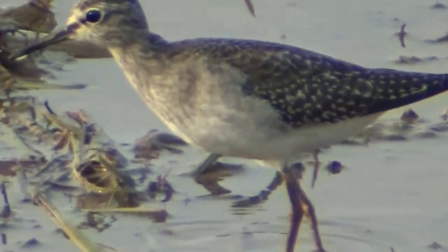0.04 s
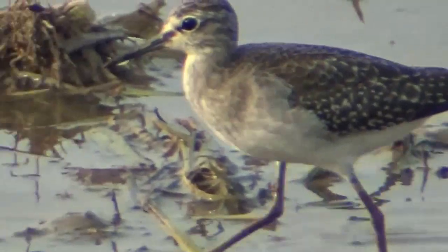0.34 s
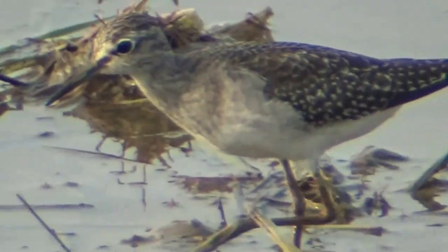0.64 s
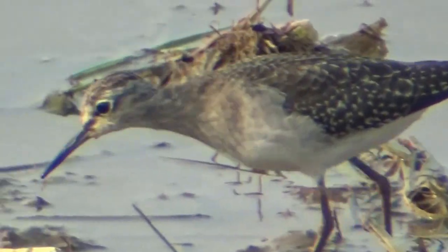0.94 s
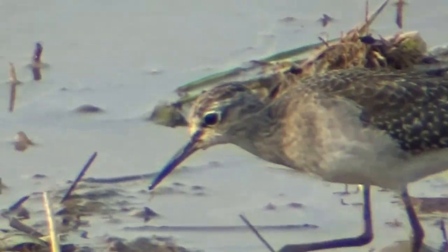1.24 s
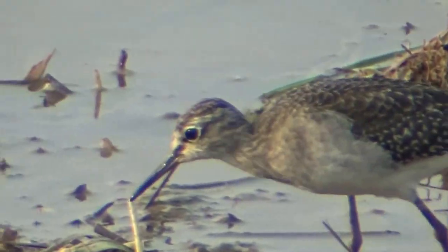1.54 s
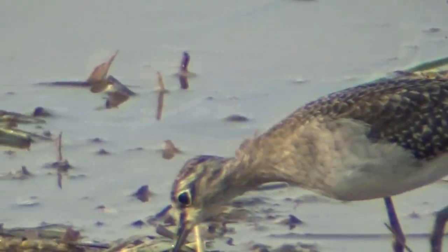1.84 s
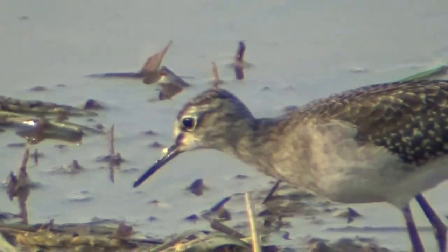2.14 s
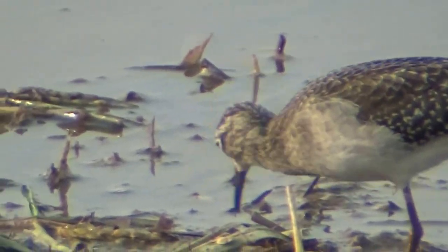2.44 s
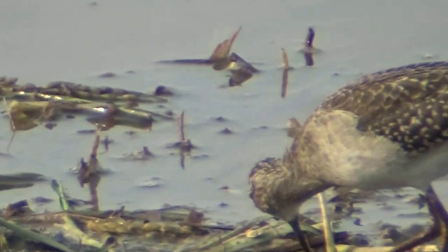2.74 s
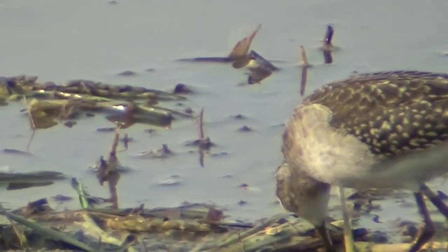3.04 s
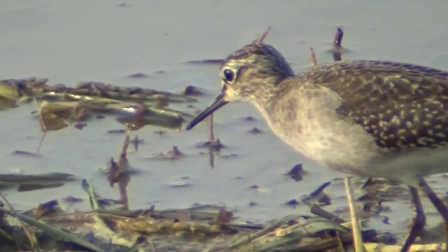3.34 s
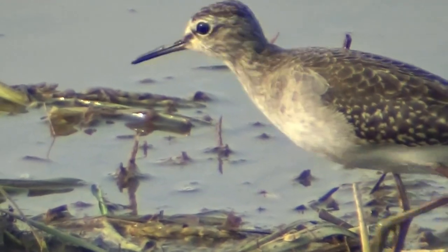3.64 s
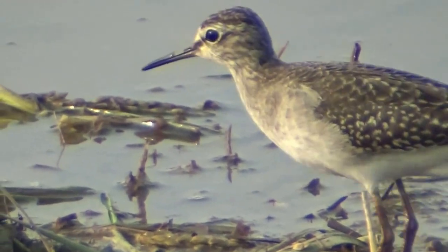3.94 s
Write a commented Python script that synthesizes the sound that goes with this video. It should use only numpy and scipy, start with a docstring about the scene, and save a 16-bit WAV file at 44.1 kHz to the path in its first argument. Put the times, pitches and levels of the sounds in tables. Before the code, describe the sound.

Small birds chirp faintly throughout, outdoors by shallow water, over a low wind-like rumble and a distant engine slowly gathering speed. A lone click comes at 0.9 seconds. Around 1.8 seconds one bird gives five quick, harsh, falling notes. A faint plip follows at 2.3, then a close wet smack at 3. From 3.2 a softer harsh run sounds, with dry clicks that gradually slow until the end.

```python
"""The edge of a muddy pool. From the start small birds whistle some way off, while the harmonic drone of
a far engine slowly gathers speed in a low, wind-like rumble. After a lone click, one bird gives a quick
run of harsh, falling notes, their harmonics filtered by its throat. A faint plip follows, then a wet
smack close by, both damped resonances. Last, the bird gives a second run as a small stiff body starts
to ring with dry clicks that gradually slow."""
import sys
import numpy as np
from scipy import signal
from scipy.fft import rfft, irfft
from scipy.io import wavfile

SR = 44100
rng = np.random.default_rng(int(sys.argv[2]) if len(sys.argv) > 2 else 0)


def persist_wave(psi):
    """Save psi, clipped to +-1, as 16-bit WAV."""
    counts = np.round(np.clip(psi, -1, 1) * 32767).astype(np.int16)
    wavfile.write(sys.argv[1], SR, np.atleast_2d(counts).T)


N = 176400
T = np.arange(N) / SR

# Harsh notes: (time of peak pitch [s], peak pitch [Hz], source level [dB], pitch decay constant [s],
# roughness of the opening [0-1])
HARSH_NOTES = [(1.802, 1093, -45.5, 0.048, 0.81), (1.863, 1100, -43, 0.054, 0.76),
               (1.926, 1079, -42, .055, .62), (1.992, 1081, -41.5, 0.054, 0.47),
               (2.052, 1075, -44.5, 0.054, 0.42), (3.218, 1070, -52, 0.074, 0.78),
               (3.284, 1068, -49.5, .06, 0.86), (3.351, 1058, -50.5, .065, 0.75),
               (3.431, 1056, -51.5, .065, 0.51)]
# Throat resonances: (frequency [Hz], gain [dB])
THROAT_RESPONSE = [(900, -36), (1500, -47), (1950, -11.5), (2450, -4.5), (2950, -1), (3400, -7.5),
                   (3900, -7.5), (4600, -24), (5600, -15), (6800, -33), (8100, -17.5), (9600, -44),
                   (13000, -33), (16000, -37)]

def chatter(rasp_s=.027, rise_hz_per_s=6000, swell_s=.007, hold_s=.0043, tail_s=.038, edge_s=.0032):
    """Source and filter: a breathy rising rasp clears and falls, sweeping harmonics through formants."""
    out, jitter, flutter = np.zeros(N), drift(306), drift(306)
    t = np.arange(-rasp_s, tail_s, 1 / SR)  # zero at the peak pitch
    opening = np.clip(-2 * t / edge_s, 0, 1)
    envelope = np.clip(np.minimum((t + rasp_s) / swell_s, (tail_s - t) / edge_s), 0, 1)
    fade_db = 380 * np.maximum(t - hold_s, 0)
    for s, peak_hz, db, fall_s, rough in HARSH_NOTES:
        here = int(s * SR) + np.arange(len(t))
        rasp = rough * opening
        roughness = .08 + rasp
        hz = np.where(t < 0, peak_hz + rise_hz_per_s * t, peak_hz * np.exp(-t / fall_s))
        phase = phase_of(hz * (1 + .1 * roughness * jitter[here]))
        voice = sum(np.sin(k * phase) for k in range(1, 15))
        voice += (from_db(6 * (1 - rasp)) - 1) * np.sin(3 * phase)  # third harmonic grows as it clears
        breath = from_db(-9) * rasp * np.sqrt(SR / peak_hz) * rng.standard_normal(len(t))
        gain = envelope * from_db(db - 2.5 * opening - fade_db)
        add(out, s - rasp_s, (voice + breath) * gain * (1 + .44 * roughness * flutter[here]))
    return np.sqrt(2) * coloured(out, THROAT_RESPONSE)


# Whistles: (time [s], duration [s], first pitch [Hz], middle pitch [Hz], last pitch [Hz], level [dB],
# roughness [relative])
WHISTLES = [(0.037, 0.035, 2774, 2500, 2270, -60, 0.37), (0.062, 0.033, 4350, 4880, 4550, -63, .2),
            (0.189, 0.03, 6860, 6450, 5500, -66, 0.24), (.24, 0.028, 3990, 4450, 4300, -66.5, .3),
            (0.323, 0.06, 4210, 4120, 3450, -63.5, .7), (0.471, .04, 3100, 2684, 1760, -55, 0.57),
            (0.558, 0.03, 2014, 2490, 4200, -56.5, 1.15), (0.598, 0.027, 4090, 4190, 3480, -51, 0.24),
            (0.933, 0.033, 3330, 2300, 1780, -54.5, 0.26), (.973, 0.055, 1447, 1796, 2020, -53, 0.08),
            (0.976, 0.037, 2930, 3460, 3700, -62, 0.07), (1.078, .03, 4080, 4040, 3950, -64.5, 0.1),
            (1.112, 0.024, 3590, 3850, 4200, -62.5, 0.14), (1.274, 0.044, 3030, 3210, 3370, -62.5, 0.03),
            (1.407, 0.067, 3970, 3950, 4000, -61, 0.27), (1.446, 0.061, 3370, 2700, 1870, -57, 0.71),
            (1.489, 0.02, 3600, 4200, 5370, -54.5, 0.25), (1.508, 0.019, 4800, 4220, 3500, -50.5, 0.27),
            (1.528, 0.021, 5430, 3270, 2290, -51.5, 0.4), (1.542, .013, 5000, 4150, 3500, -49.5, 0.6),
            (1.55, 0.026, 2440, 2110, 1970, -58, .3), (2.121, 0.042, 2616, 2077, 1650, -51, 0.27),
            (2.162, 0.078, 1746, 2200, 2310, -54.5, 0.21), (2.238, 0.043, 2400, 2480, 2480, -56.5, 0.33),
            (2.57, .03, 2930, 4340, 3380, -51.5, 0.17), (2.597, .021, 3040, 3650, 3250, -43.5, 0.12),
            (2.612, 0.027, 2950, 3030, 2870, -45, 0.37), (2.679, 0.07, 4070, 4110, 3320, -61, 0.62),
            (2.732, 0.042, 3890, 3870, 3960, -54, 0.14), (2.815, .03, 3350, 4950, 5080, -55.5, .4),
            (2.841, 0.016, 5120, 3860, 3250, -45.5, 0.29), (2.851, 0.024, 3380, 3200, 3100, -51.5, 0.09),
            (2.929, 0.056, 2920, 2590, 1960, -50.5, .35), (2.982, 0.034, 2183, 2050, 1690, -48, 0.23),
            (3.017, 0.071, 3170, 3980, 3670, -60, 0.58), (3.101, 0.045, 3186, 2960, 2500, -56.5, 0.64),
            (3.236, 0.044, 3610, 2950, 2390, -51, 0.79), (3.315, 0.037, 3694, 3040, 2600, -50.5, .8),
            (3.491, .06, 2560, 3020, 4600, -62.5, 0.8), (3.627, 0.057, 3220, 2540, 1970, -57, 0.74),
            (3.664, 0.019, 2550, 3380, 4700, -58, 0.13), (3.681, 0.033, 3180, 2780, 2340, -56, 0.54),
            (3.89, 0.056, 3670, 3930, 3600, -58, 0.48)]
# Their overtones: (frequency [Hz], level relative to the fundamental [dB])
WHISTLE_OVERTONES = [(4000, -17), (6800, -25.5), (10000, -17), (13000, -31)]

def twitter(jitter_depth=.1506, flutter_depth=.85):
    """Random modulation of frequency and amplitude adds sidebands that make gliding whistles buzz."""
    out, jitter, flutter = np.zeros(N), drift(390), drift(390)
    for s, length, first, middle, last, db, rough in WHISTLES + far_whistles():
        progress = np.linspace(0, 1, int(length * SR))
        here = (int(s * SR) + np.arange(len(progress))) % N
        hz = np.polyval(np.polyfit([0, .5, 1], [first, middle, last], 2), progress)
        phase = phase_of(hz * (1 + jitter_depth * rough * jitter[here]))
        overtones = sum(from_db(at_hz(WHISTLE_OVERTONES, k * hz)) * np.sin(k * phase) for k in (2, 3))
        envelope = np.sqrt(2) * from_db(db) * np.sin(np.pi * progress)
        add(out, s, (np.sin(phase) + overtones) * envelope * (1 + flutter_depth * rough * flutter[here]))
    return out


def far_whistles(count=30, centre_hz=3210, length_s=.045, db=-67, rough=.3):
    """A random chorus: rows for fainter whistles, scattered in time and around one pitch."""
    starts = (np.arange(count) + rng.random(count)) / count * N / SR
    offsets = rng.uniform(-.18, .18, (count, 1))
    bends = rng.uniform(-.12, .12, (count, 3))
    pitches = centre_hz * np.exp(offsets + bends)
    return [(s, length_s, *hz, db, rough) for s, hz in zip(starts, pitches)]


# Thin scratchy calls: (time [s], duration [s], level [dB])
SCRATCHY_CALLS = [(0.159, 0.026, -56.5), (0.541, 0.039, -55), (0.56, 0.076, -61), (1.509, 0.052, -61.5),
                  (2.098, 0.037, -51), (2.561, 0.037, -58.5), (3.859, 0.047, -61.5)]
# Their spectrum: (frequency [Hz], relative level [dB])
SCRATCH_SPECTRUM = [(1500, -47), (2800, 4), (5000, 1.5), (7000, -4.5), (10000, 2), (12500, -17),
                    (16000, -34)]

def scratches():
    """Aperiodic sound has no pitch: bursts of shaped noise rasp among the twitter."""
    envelope = np.zeros(N)
    for s, length, db in SCRATCHY_CALLS:
        add(envelope, s, from_db(db) * np.hanning(int(length * SR)))
    return envelope * noise(SCRATCH_SPECTRUM)


# Dry clicks: (time [s], level [dB], treble tilt [dB/octave])
CLICK_IMPACTS = [(0.905, -43, 1.5), (3.2202, -40.5, 1), (3.2385, -38.5, 0), (3.2553, -38.5, -2),
                 (3.2792, -38.5, 0.5), (3.3173, -41, 0.5), (3.336, -42, -1), (3.3521, -49.5, 4),
                 (3.358, -49, 1), (3.3906, -34.5, -1), (3.4571, -33, -0.5), (3.5697, -34, 0),
                 (3.685, -33.5, .5), (3.7964, -32, -.5), (3.9492, -31, -1)]
# Modes of the small stiff body: (frequency [Hz], relative level [dB], 60 dB decay time [s])
BODY_MODES = [(705, -18, .012), (1130, -9.5, 0.011), (1467, -6, 0.012), (2260, -2, 0.017),
              (2630, -3.5, .007), (3090, -9.5, .006), (3910, -13.5, 0.014), (4640, -11.5, 0.014),
              (5960, -13, 0.0072), (7513, -15.5, 0.0043), (9000, -7.5, 0.0066), (10450, -23, .0036),
              (12500, -21, .0035), (14200, -13, .006)]

def clicks(snap_s=.003, lag_s=.0009, pivot_hz=1467, spread_db=1.5, detune=.035):
    """Modal ringing with dispersion: a stiff body snaps and rebounds, its highs ahead of its lows."""
    out, t, impulse = np.zeros(N), T[:SR // 20], signal.unit_impulse(SR // 20)
    for s, db, tilt_db in CLICK_IMPACTS:
        rebound_s = .0018 * (1 + .25 * rng.standard_normal())
        snap = rng.standard_normal(len(t)) * np.exp(-t / snap_s)
        add(out, s, from_db(db - 12) * snap)
        for k, (hz, mode_db, t60) in enumerate(BODY_MODES):
            ratio = hz / pivot_hz
            gain = from_db(db + mode_db + tilt_db * np.log2(ratio) + spread_db * rng.standard_normal())
            detuned_hz = hz * (1 + detune * rng.uniform(-2.1, 1.9))
            mode = (-1) ** k * gain * ring(impulse, detuned_hz, t60)
            arrival = s + lag_s / np.sqrt(ratio)
            add(out, arrival, mode)
            add(out, arrival + rebound_s, from_db(-2.5) * mode)
    return out


# Resonances of the wet smack: (frequency [Hz], relative level [dB], 60 dB decay time [s])
SMACK_RESONANCES = [(783, 2.5, 0.015), (1060, 5.5, 0.0032), (1990, -4, 0.014), (2750, -5, 0.014),
                    (3500, -4.5, 0.017), (4870, -5, 0.0054), (6100, -14, 0.0085), (8900, -6.5, 0.0065),
                    (9950, -12, .005)]

def water(plip_s=2.322, plip_db=-44, smack_s=2.9867, smack_db=-26):
    """Damped free vibration: one resonance makes a faint plip, several at once a sharp wet smack."""
    out, impulse = np.zeros(N), signal.unit_impulse(SR // 5)
    add(out, plip_s, from_db(plip_db) * ring(impulse, hz=958, t60=.05))
    for k, (hz, db, t60) in enumerate(SMACK_RESONANCES):
        add(out, smack_s, (-1) ** k * from_db(smack_db + db) * ring(impulse, hz, t60))
    return out


# Far engine gathering speed: (time [s], firing rate [Hz], level [dB])
ENGINE_RUN = [(0, 74.2, -54.5), (.56, 77.15, -60), (1.1, 80.94, -50.5), (1.71, 84.7, -53),
              (2.5, 89.36, -49.5), (3.3, 93.06, -46), (4, 93.7, -45.5)]
# Its orders: (multiple of the firing rate [ratio], relative level [dB])
FIRING_ORDERS = [(.5, -16.5), (1, -1.5), (1.5, -11.5), (2, -15), (3, -19)]

def engine(waver_db=1.5):
    """Periodic firing: all orders climb with the firing rate, each wavering in level."""
    hz, db = in_time(ENGINE_RUN)
    phase = phase_of(hz)
    return np.sqrt(2) * sum(from_db(db + order_db + waver_db * drift(4.4)) * np.sin(order * phase)
                            for order, order_db in FIRING_ORDERS)


# A thin whine and two hums: (start [s], end [s], frequency [Hz], level [dB], rms waver [dB])
FAINT_TONES = [(0, 2.9, 13248, -84, 1), (2.2, 4, 585, -66, 2), (0, 1.6, 138, -57, 2)]

def tones(wander_hz=2, fade_s=.14):
    """Slow modulation: faint sinusoids come and go, wandering in pitch and level."""
    out = np.zeros(N)
    for start, end, hz, db, waver_db in FAINT_TONES:
        gate = np.clip(1 + np.minimum(T - start, end - T) / fade_s, 0, 1)
        gain = from_db(db + waver_db * drift(2.2))
        out += gate * gain * np.sin(phase_of(hz + wander_hz * drift(7.6)))
    return np.sqrt(2) * out


# Wind-like rumble and open air: (frequency [Hz], relative spectral density [dB])
RUMBLE_SPECTRUM = [(12, -10), (30, -21), (54, -20.5), (64, -1.5), (91, -6), (108, 0.5), (135, 2), (171, -6),
                   (217, -0.5), (369, -7.5), (448, -18.5), (700, -28.5), (1200, -51)]
AIR_SPECTRUM = [(290, -31), (500, -4), (773, 1), (933, -6.5), (1020, -5.5), (1210, -8.5), (1440, -7),
                (1600, -9.5), (3810, -18.5), (4600, -22), (9490, -24.5), (10500, -22.5), (12000, -28),
                (14300, -28), (16000, -30)]
# Their envelopes: (time [s], level [dB])
RUMBLE_ENVELOPE = [(0, -51.5), (.12, -44.5), (.45, -44.5), (.72, -46.5), (.92, -45), (1.3, -48),
                   (1.5, -45.5), (1.75, -49.5), (2.2, -46.5), (2.85, -50), (3.4, -48), (3.6, -47.5),
                   (4, -51.5)]
AIR_ENVELOPE = [(0, -56.5), (1.2, -57), (2.4, -56.5), (4, -57)]
# Their stereo balance: (frequency [Hz], left minus right [dB])
NOISE_BALANCE = [(60, 0.5), (140, 0.3), (280, 2), (550, 5), (1200, 2), (4000, -1), (12000, 1)]

def background(spectrum, envelope, waver_db, side_db=-20):
    """Partial coherence: far noise is nearly alike in both channels, its middle range leaning left."""
    db, = in_time(envelope)
    mid = noise(spectrum)
    left = coloured(mid, [(hz, lean / 2) for hz, lean in NOISE_BALANCE])
    right = coloured(mid, [(hz, -lean / 2) for hz, lean in NOISE_BALANCE])
    gain = from_db(db + waver_db * drift(11.6))
    side = from_db(side_db) * noise(spectrum)
    return gain * np.array([left + side, right - side])


def outdoors(x, scatter_db, echo_s=.0084, echo_db=-15.5, t60=.52):
    """Reflection and scattering add one early echo and an exponentially decaying tail."""
    tail = rng.standard_normal(SR) * from_db(-60 * T[:SR] / t60)
    tail *= from_db(scatter_db) / np.linalg.norm(tail)
    return x + from_db(echo_db) * delayed(x, echo_s) + signal.fftconvolve(x, tail)[:N]


def ring(force, hz, t60):
    """Damped resonator: a unit impulse starts a decaying sine of unit amplitude."""
    r, w = from_db(-60 / (t60 * SR)), 2 * np.pi * hz / SR
    return signal.lfilter([0, np.sin(w)], [1, -2 * r * np.cos(w), r * r], force + 1e-18)


def phase_of(hz):
    """Phase is the integral of frequency."""
    return 2 * np.pi * np.cumsum(hz) / SR


def from_db(db):
    """Decibels to amplitude ratio."""
    return 10 ** (np.asarray(db) / 20)


def rms_one(x):
    """Normalisation to unit rms."""
    return x / np.sqrt(np.mean(x ** 2) + 1e-20)


def in_time(rows):
    """Linear interpolation of each column over time."""
    s, *columns = np.transpose(rows)
    return [np.interp(T, s, c) for c in columns]


def at_hz(points, hz):
    """Interpolation of a spectrum on a log-frequency axis."""
    f, db = np.transpose(points)
    return np.interp(np.log(np.maximum(hz, 1)), np.log(f), db)


def coloured(x, response):
    """Filtering multiplies the spectrum by a frequency response."""
    return irfft(rfft(x) * from_db(at_hz(response, np.fft.rfftfreq(N, 1 / SR))), N)


def noise(spectrum):
    """Filtered white noise of unit rms."""
    return rms_one(coloured(rng.standard_normal(N), spectrum))


def drift(hz):
    """Low-pass noise: a random wander of unit rms."""
    rolloff = 1 + (np.fft.rfftfreq(N, 1 / SR) / hz) ** 2
    return rms_one(irfft(rfft(rng.standard_normal(N)) / rolloff, N))


def delayed(x, s):
    """Propagation delay of s seconds."""
    return np.interp(T - s, T, x, left=0)


def add(out, s, sound):
    """Superposition of a sound starting at s seconds."""
    i = max(int(s * SR), 0)
    out[i:i + len(sound)] += sound[:max(N - i, 0)]


def pan(x, db):
    """Direction from level difference, left minus right."""
    return x * from_db(np.array([[db], [-db]]) / 2)


def scene():
    """Superposition of birds, near clicks and water, a far engine and open air."""
    harsh = chatter()
    off_water = from_db(-6.5) * delayed(harsh, s=.00206)
    harsh = outdoors(harsh + off_water, scatter_db=-14.5)
    small_birds = outdoors(twitter(), scatter_db=-9.5) + scratches()
    birds = pan(harsh, db=3) + pan(small_birds, db=2.5)
    rumble = background(RUMBLE_SPECTRUM, RUMBLE_ENVELOPE, waver_db=1.25)
    air = background(AIR_SPECTRUM, AIR_ENVELOPE, waver_db=1.35)
    return birds + pan(clicks() + water() + tones(), db=2) + pan(engine(), db=-.5) + rumble + air


def record(dry, cutoff_hz=16000):
    """Band limiting: a steep low-pass filter removes the highest treble."""
    return signal.sosfiltfilt(signal.ellip(10, .05, 60, cutoff_hz, fs=SR, output="sos"), dry)


dry = scene()
out = record(dry)
persist_wave(out)
```